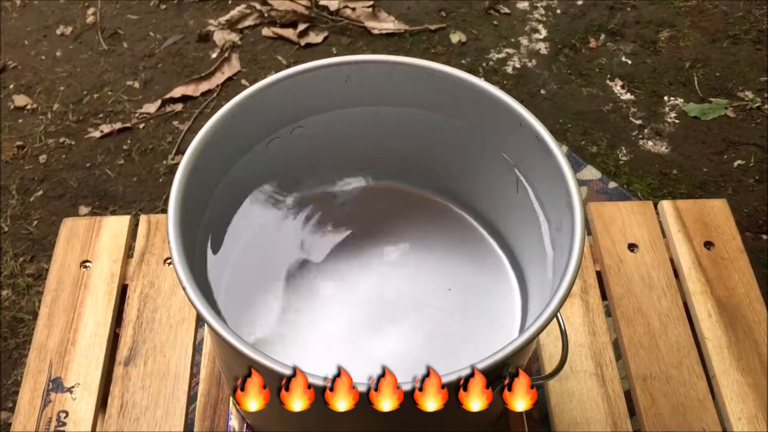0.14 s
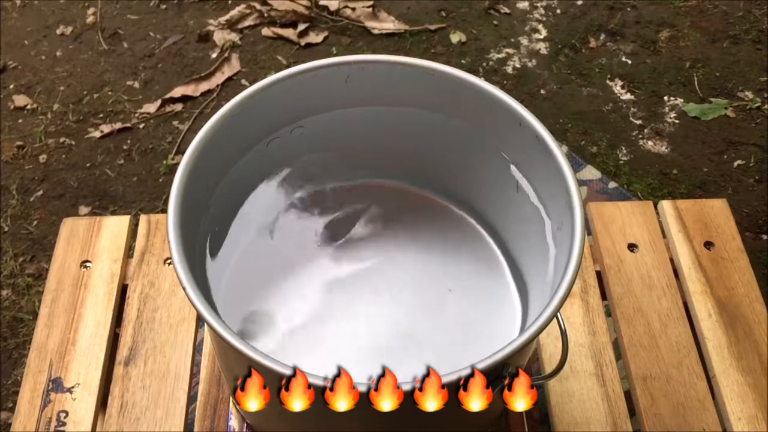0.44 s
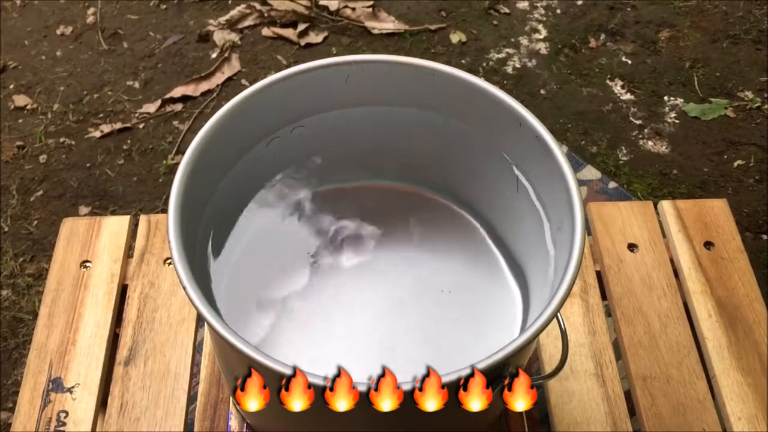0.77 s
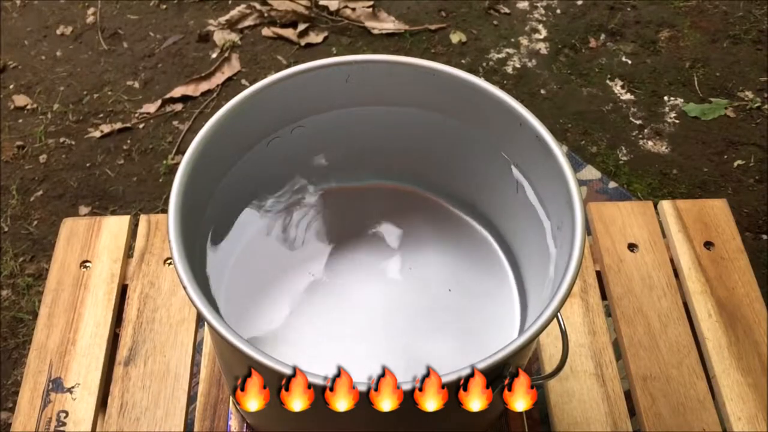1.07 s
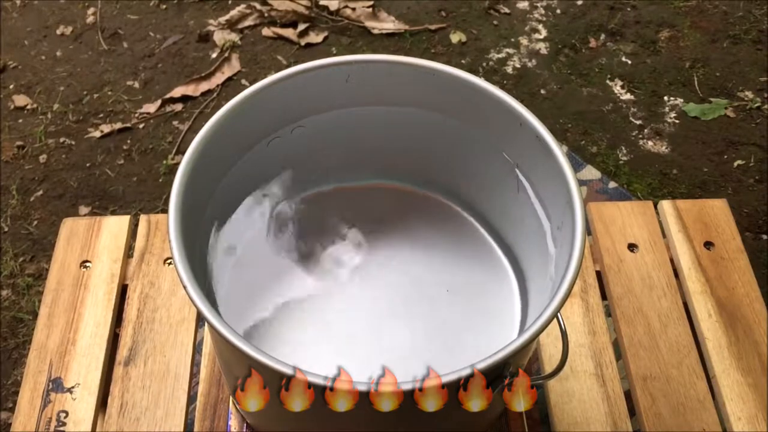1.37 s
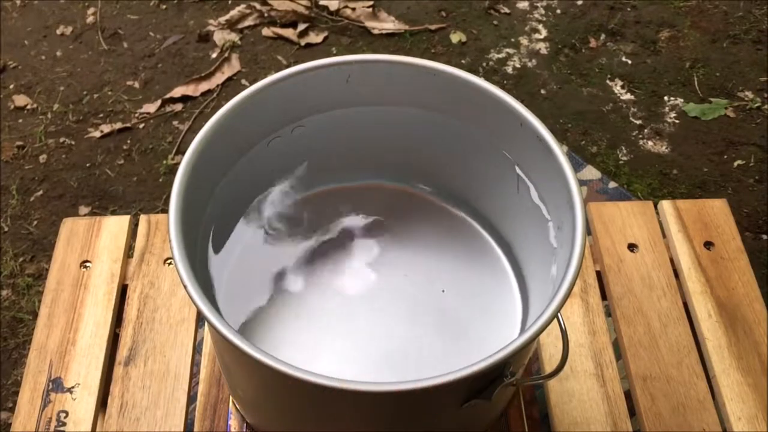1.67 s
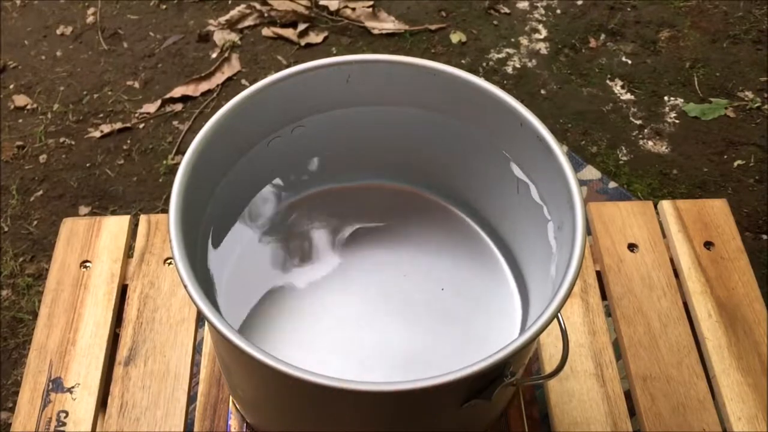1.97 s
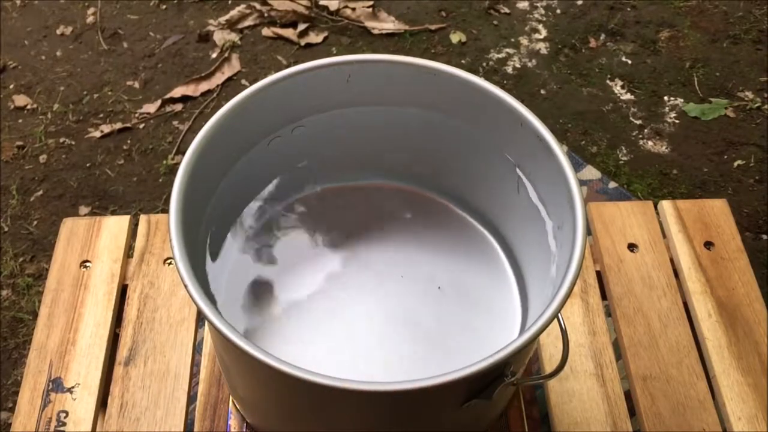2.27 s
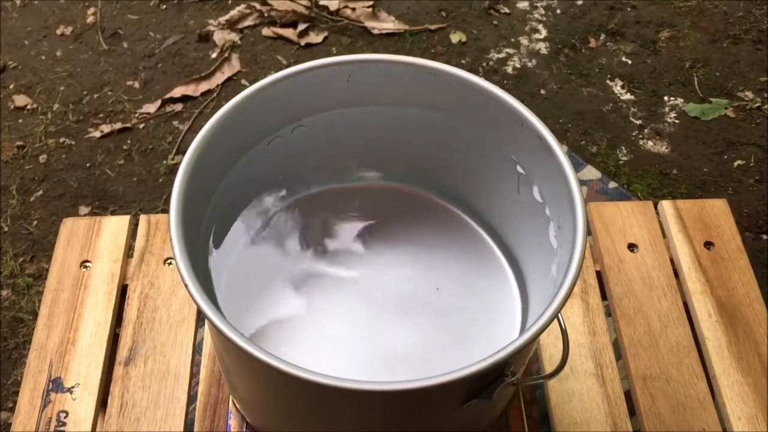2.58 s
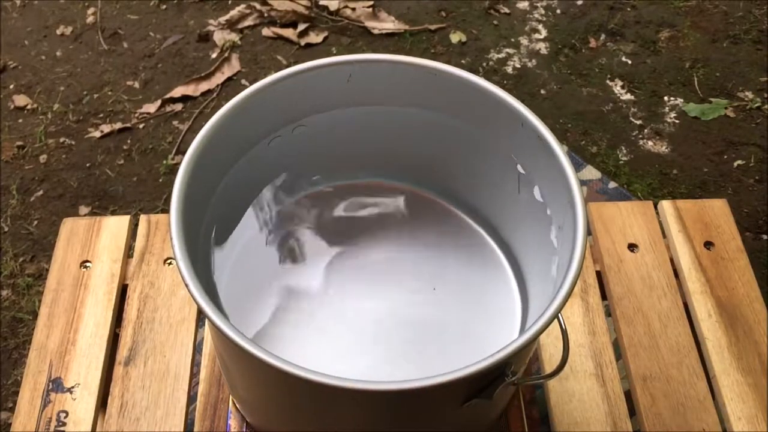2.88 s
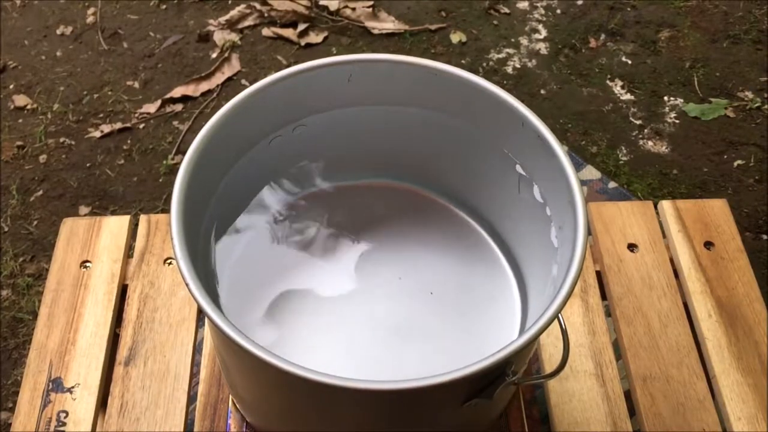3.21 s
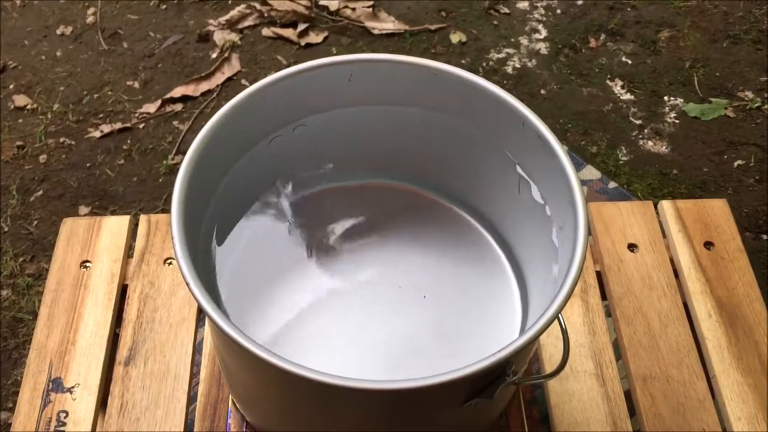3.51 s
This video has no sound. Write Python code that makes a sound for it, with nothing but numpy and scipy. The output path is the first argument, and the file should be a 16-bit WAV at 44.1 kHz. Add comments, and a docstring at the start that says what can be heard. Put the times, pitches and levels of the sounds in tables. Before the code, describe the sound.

Camp stove gas flame hiss grows steadily louder and fuller, with one sharp knock on the pot early on.

```python
"""Outdoors, a gas camp burner under a pot of water is turned up from a low flame to a full roar.
The jet hiss is noise shaped by resonances and gaps of burner and pot; the flame is low noise with a climbing throb.
One sharp knock, with a fast rebound, adds a noise crack and rings the pot as decaying sines.
Faint rustles and spits are short puffs of band-passed noise."""
import sys
import numpy as np
from scipy import signal
from scipy.io import wavfile
from scipy.ndimage import uniform_filter1d

SR = 44100
rng = np.random.default_rng(int(sys.argv[2]) if len(sys.argv) > 2 else 0)


def decibels_to_gain(level_db):
    """Convert a level in decibels to a linear amplitude gain (20 dB per decade)."""
    exponent = np.asarray(level_db, float) / 20
    return 10 ** exponent


def materialize(psi):
    """Save the field psi as 16-bit PCM at rate SR to the path in sys.argv[1].

    A 1-D psi becomes a single channel; in a 2-D psi each row is a channel.
    """
    bounded = np.clip(np.atleast_2d(psi).T, -1, 1)
    quanta = np.round(bounded * 32767).astype(np.int16)
    wavfile.write(sys.argv[1], SR, quanta)


N = 160965


def evened(x):
    """Scales to unit rms."""
    return x / np.sqrt(np.mean(x ** 2) + 1e-20)


def unit(spectrum_db):
    """Shifts a spectrum so that its mean power over the bins is one."""
    return spectrum_db - 10 * np.log10(np.mean(decibels_to_gain(spectrum_db) ** 2, axis=0))


def read(points, hz):
    """Interpolates (hz, value) points over log frequency."""
    point_hz, value = np.transpose(points)
    return np.interp(np.log(hz + 1), np.log(point_hz + 1), value)


def add(mix, start_s, sound):
    """Adds a sound in place, cut at the end of the mix."""
    part = mix[round(start_s * SR):][:len(sound)]
    part += sound[:len(part)]


def filtered_noise(count, edge_hz, kind):
    """White noise through a Butterworth filter."""
    sos = signal.butter(2, edge_hz, kind, fs=SR, output="sos")
    return signal.sosfilt(sos, rng.standard_normal(count))


def wander(t):
    """Slow random sway: sines of 0.4-4 Hz with random phases, at unit rms."""
    sway_hz = [.4, .7, 1.1, 1.7, 2.6, 4.]
    return evened(sum(np.sin(2 * np.pi * (f * t + rng.random())) / np.sqrt(f) for f in sway_hz))


def noise(colour_db, size, patchy_db, flicker_db, fine_db):
    """Random short-time spectra shaped by colour_db(hz, t), with drifting patches, narrow streaks, shared flicker."""
    hop = size // 4
    frames = N // hop + 5
    hz = np.fft.rfftfreq(size, 1 / SR)[:, None]
    t = np.arange(frames) * hop / SR
    real, imag, patches, streaks = rng.standard_normal((frames, size // 2 + 1, 4)).T
    # axis 0: frequency bins, axis 1: frames
    patches = evened(uniform_filter1d(uniform_filter1d(patches, size=16, axis=0), size=10, axis=1))
    streaks = evened(uniform_filter1d(uniform_filter1d(streaks, size=3, axis=0), size=30, axis=1))
    flicker = evened(uniform_filter1d(rng.standard_normal(frames), size=4))
    level_db = colour_db(hz, t) + patchy_db * patches + fine_db * streaks + flicker_db * flicker
    spectra = (real + 1j * imag) * decibels_to_gain(level_db)
    return signal.istft(spectra, nperseg=size, noverlap=size - hop)[1][:N] / np.sqrt(size) * 2


# gas valve: start_s, hiss_level_db, flame_size (0-1), jet_sharpness_db
VALVE = [(0, -61.5, 0.15, 1), (.25, -60.5, 0.14, 2.5), (.6, -55.5, 0.23, -1), (.95, -55, 0.37, -2),
         (1.3, -54, 0.39, 1), (1.6, -50, 0.55, -6), (1.85, -51.5, 0.6, 2), (2.0, -50.5, 0.69, 11),
         (2.15, -49.5, 0.81, 9), (2.35, -47, 0.9, 8), (2.55, -46.5, 0.89, 3), (2.75, -45.5, 0.95, 0.5),
         (3.1, -45.5, 0.97, -0.5), (3.64, -43.5, 0.97, -6.5)]


def control(t, axis):
    """One column of the valve table, interpolated over time."""
    table = np.array(VALVE)
    return np.interp(t, table[:, 0], table[:, axis])


# faint rustles and spits: start_s, length_s, level_db, lowest_hz, highest_hz
RUSTLES = [(0.87, 0.035, -65, 500, 1500), (0.945, 0.07, -60.5, 5000, 12500), (0.99, 0.07, -65, 5000, 11000),
           (1.151, 0.015, -54, 700, 14000), (2.2, .022, -55.5, 12000, 15000),
           (2.65, 0.09, -62, 7000, 15000)]


def rustle(length_s, level_db, low_hz, high_hz):
    """A short puff of band-passed noise that swells and fades."""
    u = np.arange(round(length_s * SR)) / (length_s * SR)
    puff = filtered_noise(len(u), [low_hz, high_hz], "band")
    return decibels_to_gain(level_db) * evened(puff) * np.sin(np.pi * u ** 1.1) ** 0.57


# knock and rebound: start_s, level_db, brightness (0-1)
KNOCKS = [(.6461, -15, 0.93), (0.6506, -25, 0.17)]
# pot modes: pitch_hz, level_db, t60_s
POT = [(330, -29, 0.047), (410, -2, 0.057), (438.4, -14, 0.2), (494, -15, 0.094), (565, -16, 0.21),
       (638, -15, 0.23), (671, -4, 0.1), (810, -15, 0.011), (1127, -4, .032), (1245, -6, .032),
       (1390, -6, .032), (1500, -10, .03), (1590, -7, .04), (2020, -13, 0.036), (2450, 2.5, 0.0055),
       (3370, -3, 0.019), (5900, -1.5, 0.0056), (11100, -8, 0.0047)]


def pot_ring(t, bright):
    """Decaying pot modes, each swelling in over its first cycle; duller blows tilt towards the high modes."""
    tilt_db_per_octave, swell_cycles = 2.5, 0.84
    ring = 0
    for hz, level_db, t60_s in POT:
        tilt_db = tilt_db_per_octave * (1.02 - bright) * np.log2(hz / 1000)
        envelope = decibels_to_gain(level_db - 60 * t / t60_s + tilt_db) * np.minimum(t * hz / swell_cycles, 1)
        ring = ring + envelope * np.sin(2 * np.pi * hz * t)
    return ring


def knock(level_db, bright):
    """A blow on the pot: decaying noise crack and shorter treble snap over the ringing modes."""
    crack_db, crack_t60_s, crack_top_hz = -5, 0.056, 4300
    snap_db, snap_t60_s, ring_db = -8, 0.02, -7
    t = np.arange(SR // 4) / SR
    burst = filtered_noise(len(t), [500, crack_top_hz], "band")
    snap = filtered_noise(len(t), crack_top_hz, "high")
    crack = burst * decibels_to_gain(crack_db - 60 * t / crack_t60_s) + snap * decibels_to_gain(snap_db - 60 * t / snap_t60_s)
    return decibels_to_gain(level_db) * (-decibels_to_gain(ring_db) * pot_ring(t, bright) + bright * crack)


# low flame spectrum: pitch_hz, relative_level_db
FLAME_LOW = [(15, -69), (25, -59), (54, 4), (128, 3.5), (161, -3), (189, -11), (226, -6), (345, -24.5),
             (1040, -38), (1200, -36.5), (1560, -21), (2640, -120)]
# full flame spectrum: pitch_hz, relative_level_db
FLAME_FULL = [(15, -60), (25, -58), (40, -49), (55, -7), (144, -2.5), (199, 0), (230, -4.5), (262, -11),
              (330, -12), (430, -10), (540, -8.5), (670, -7), (813, -20.5), (957, -15.5), (1200, -44.5),
              (1560, -77), (2640, -120)]
# throb, rising in pitch as the flame lengthens: start_s, pitch_hz, boost_db
THROB = [(0, 110, 0), (1.6, 120, 3), (2.3, 153, 3.5), (2.9, 168, 6), (3.3, 205, 5.5), (3.65, 190, 5.5)]


def flame():
    """Rumble and roar: the low-flame spectrum turns into the full one with flame size, plus a climbing throb."""
    low_db, full_db, throb_width_hz = -51.5, -39.5, 26

    def colour_db(hz, t):
        low = unit(read(FLAME_LOW, hz)) + low_db
        full = unit(read(FLAME_FULL, hz)) + full_db
        start_s, pitch_hz, boost_db = np.transpose(THROB)
        throb_hz = np.interp(t, start_s, pitch_hz)
        throb = np.interp(t, start_s, boost_db) * np.exp(-((hz - throb_hz) / throb_width_hz) ** 2)
        return low + (full - low) * control(t, axis=2) + throb

    return noise(colour_db, size=4096, patchy_db=0.0, flicker_db=0.34, fine_db=2.1)


# broad jet noise between resonances: pitch_hz, relative_level_db
JET = [(700, -70), (1200, -23.5), (2000, -15.5), (5000, -13), (8000, -22.5), (12000, -29.5), (14000, -24),
       (15700, -27)]
# burner and pot resonances: pitch_hz, width_hz, low_flame_db, full_flame_db
BURNER = [(2020, 280, -9.5, -9.5), (2297, 145, 1.5, -0.5), (2396, 96, 6, 0.5), (2920, 900, -11.5, -6),
          (3080, 190, -7.5, -3), (3314, 150, -6.5, -5), (3912, 135, -8.5, 1), (4145, 55, -1, 3),
          (4310, 290, -11.5, -9), (5306, 126, -8, -4.5), (5794, 230, -3, -6), (6150, 310, 1, -6.5),
          (6400, 145, -43, -1.5), (6720, 74, -10, -10), (7120, 550, -5.5, -24.5), (7970, 900, -34, -17),
          (8657, 460, -13, -7), (9670, 400, -53, -18.5), (10660, 750, -17, -13), (12400, 360, -21, -27),
          (13000, 360, -27, -19)]
# narrow gaps where paths cancel: pitch_hz, width_hz, low_flame_db, full_flame_db
GAPS = [(2750, 84, -6, -12.5), (3710, 80, -5, 1), (4780, 150, -10, 0.5), (7640, 200, -2, -5),
        (9260, 145, -9, -6), (10480, 440, -10, -16.5), (12100, 180, -1, -10)]
# bands loudest at half flame: pitch_hz, width_hz, boost_db
HALF_FLAME = [(2346, 190, 1.5), (11060, 600, 5), (13300, 900, 1)]
# how far each band follows jet sharpness: pitch_hz, share
SHARP = [(2500, 0.24), (4600, 0.016), (5200, 0.82), (6000, 0.63), (6600, 0.36), (9000, 0.18), (11000, 0.18),
         (15000, 0.46)]


def hiss():
    """Jet noise through wavering resonances of burner and pot, whose balance shifts with flame size."""
    drift_share, drift_db = .004, 1.3  # rms drift of resonance pitch and level

    def colour_db(hz, t):
        size = control(t, axis=2)
        power = decibels_to_gain(read(JET, hz)) ** 2 * np.ones(len(t))
        for f, width_hz, low_db, full_db in BURNER:
            peak_db = low_db + (full_db - low_db) * size + drift_db * wander(t)
            peak_hz = f * (1 + drift_share * wander(t))
            power = power + decibels_to_gain(peak_db) ** 2 / (1 + ((hz - peak_hz) / width_hz) ** 2 * 2) ** 2
        gaps = sum((low_db + (full_db - low_db) * size) * np.exp(-((hz - f) / width_hz) ** 2)
                   for f, width_hz, low_db, full_db in GAPS)
        half = 1 - (2 * size - 1) ** 2
        singing = sum(boost_db * half * np.exp(-((hz - f) / width_hz) ** 2)
                      for f, width_hz, boost_db in HALF_FLAME)
        balance = unit(10 * np.log10(power) + gaps + singing)
        return balance + control(t, axis=1) + read(SHARP, hz) * control(t, axis=3)

    return noise(colour_db, size=2048, patchy_db=1.03, flicker_db=0.58, fine_db=2.5)


def scene():
    """Hiss and flame throughout, with the knock and the rustles at their times."""
    mix = hiss() + flame()
    for start_s, *row in KNOCKS:
        add(mix, start_s, knock(*row))
    for start_s, *row in RUSTLES:
        add(mix, start_s, rustle(*row))
    return mix[None]


def roll_off(x):
    """The treble ends steeply here."""
    return signal.sosfilt(signal.butter(12, 16790, fs=SR, output="sos"), x)


def record(dry):
    """Microphone low cut and treble band limit."""
    low_cut_hz, edge_hz = 49, 15740
    cut = signal.sosfilt(signal.butter(2, low_cut_hz, "high", fs=SR, output="sos"), dry)
    band_limit = signal.firwin(1023, edge_hz, window=("kaiser", 7), fs=SR)
    finished = signal.oaconvolve(cut, band_limit[None], "same")
    return roll_off(finished)


dry = scene()
out = record(dry)
materialize(out)
```